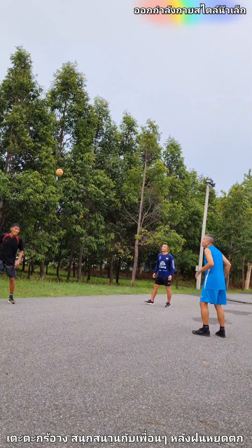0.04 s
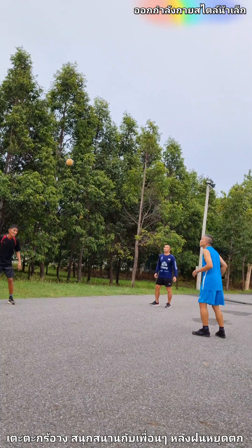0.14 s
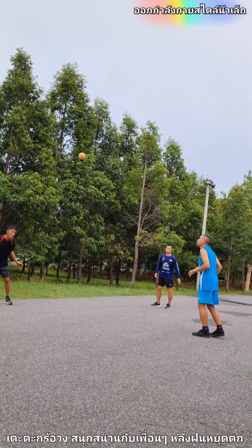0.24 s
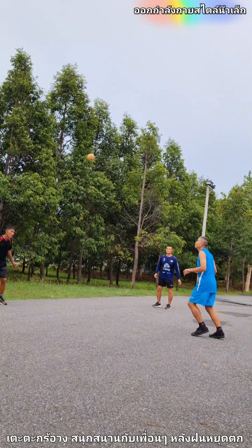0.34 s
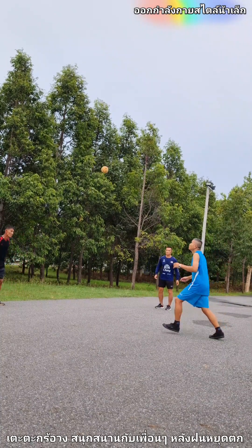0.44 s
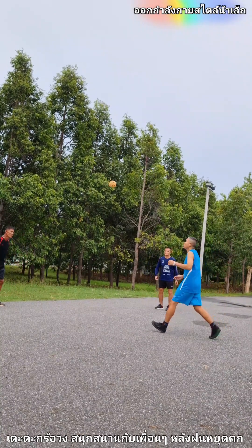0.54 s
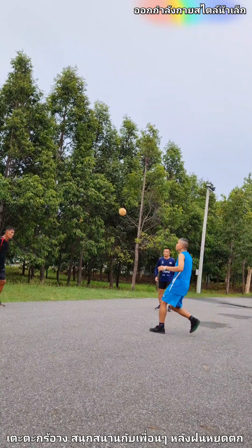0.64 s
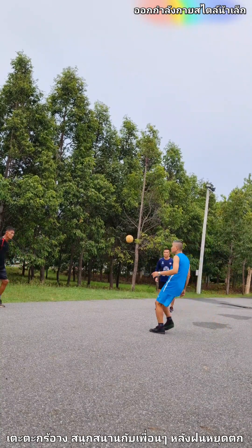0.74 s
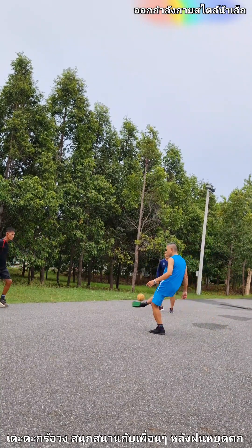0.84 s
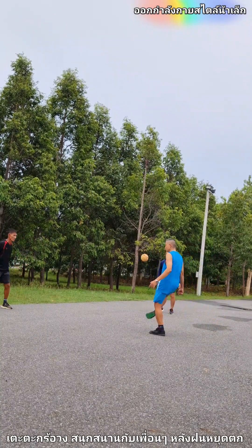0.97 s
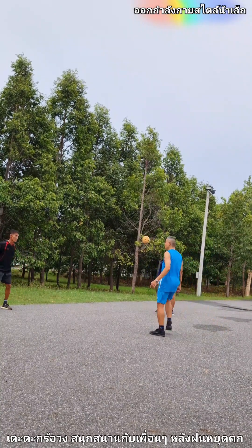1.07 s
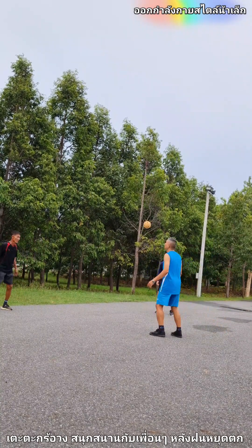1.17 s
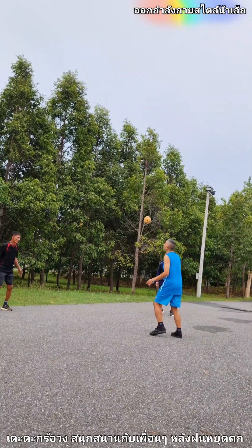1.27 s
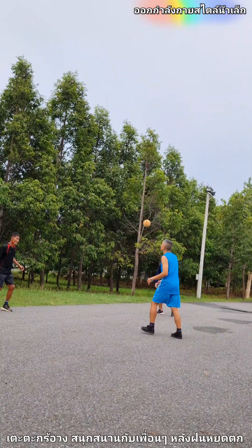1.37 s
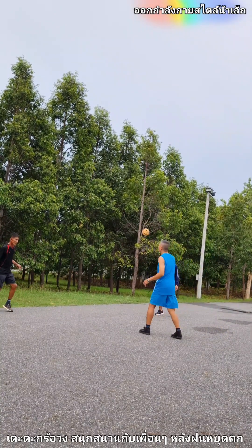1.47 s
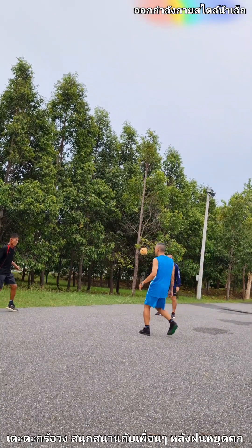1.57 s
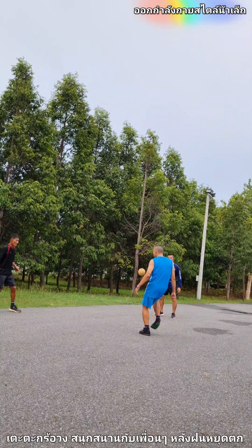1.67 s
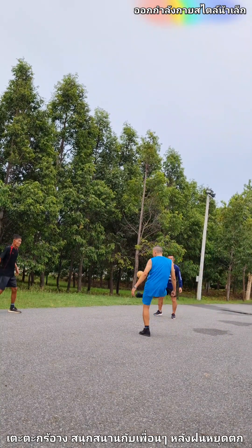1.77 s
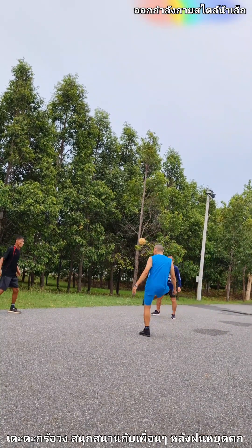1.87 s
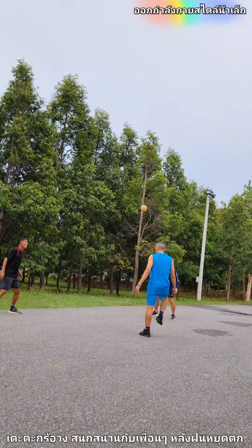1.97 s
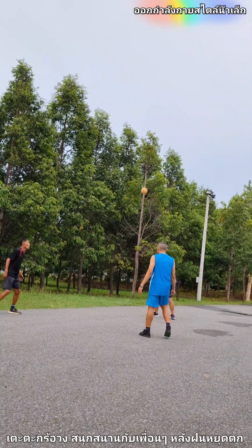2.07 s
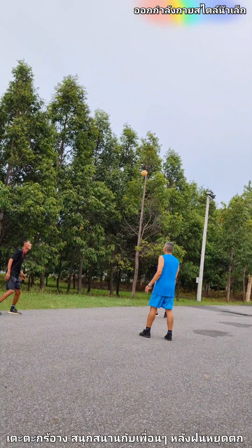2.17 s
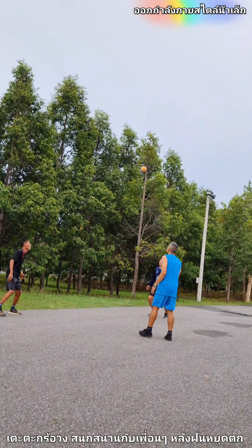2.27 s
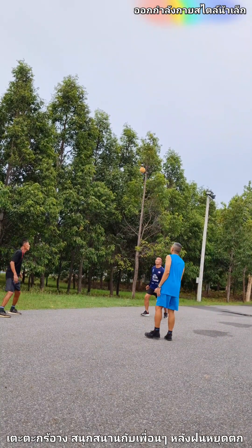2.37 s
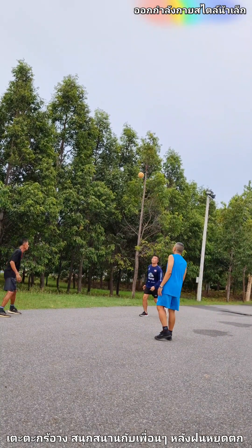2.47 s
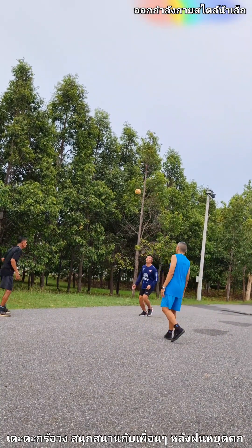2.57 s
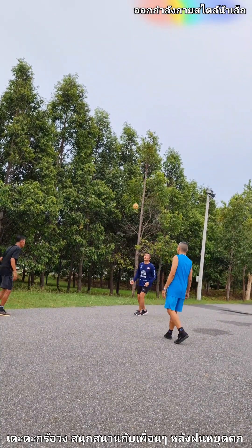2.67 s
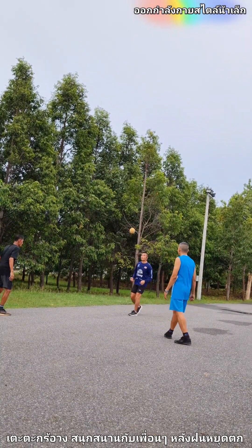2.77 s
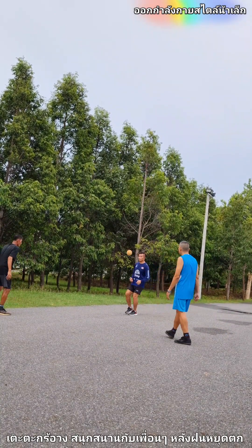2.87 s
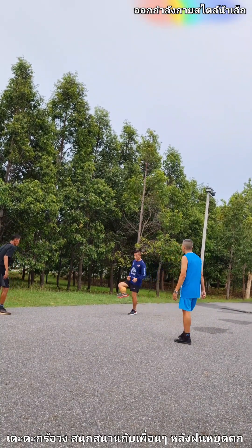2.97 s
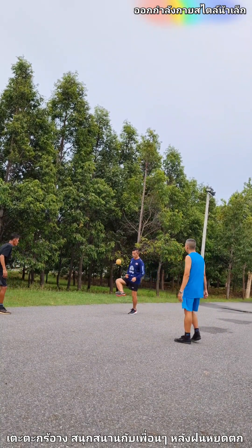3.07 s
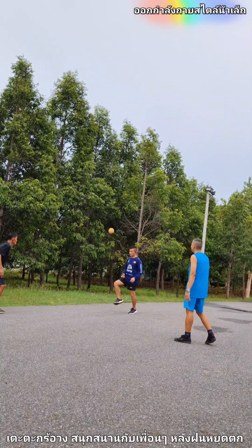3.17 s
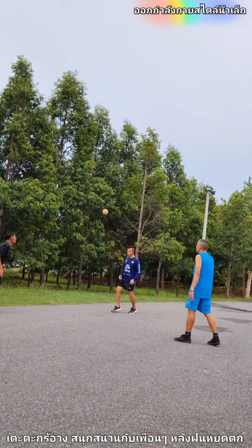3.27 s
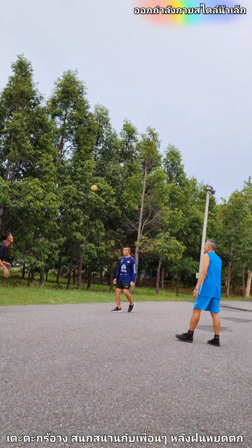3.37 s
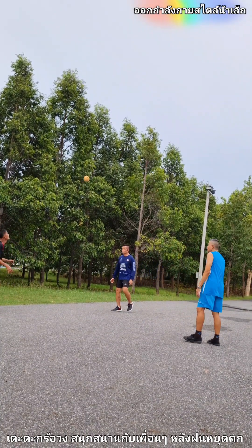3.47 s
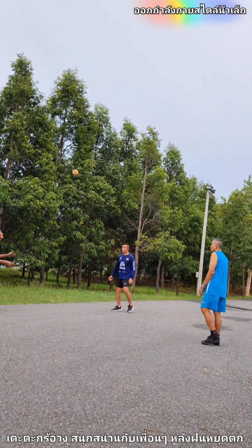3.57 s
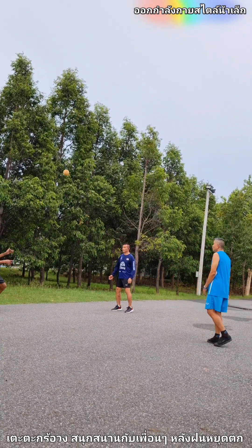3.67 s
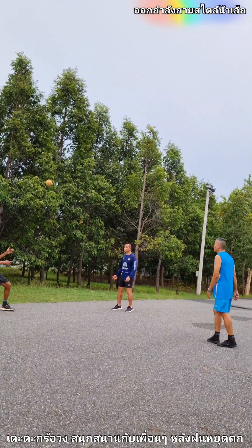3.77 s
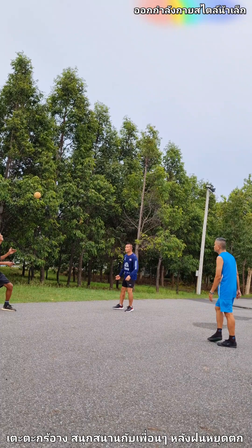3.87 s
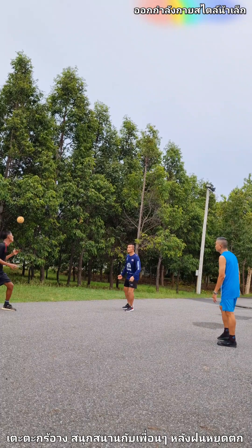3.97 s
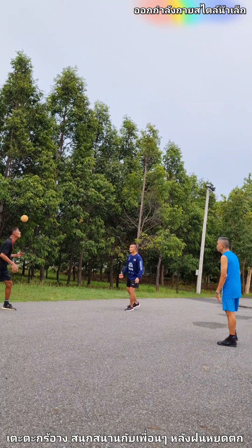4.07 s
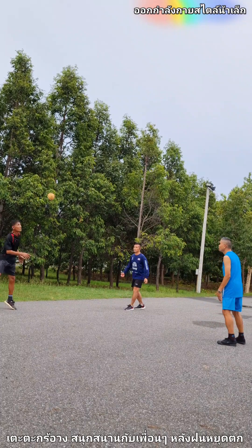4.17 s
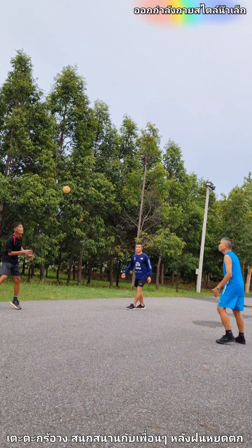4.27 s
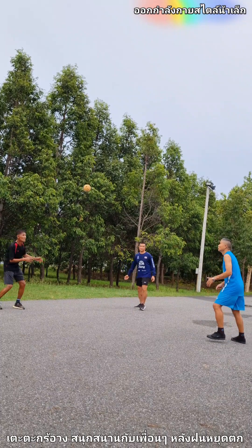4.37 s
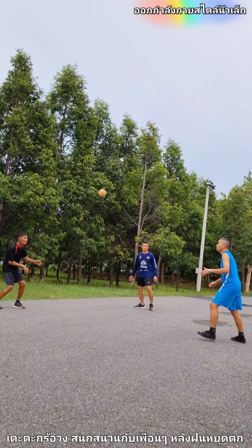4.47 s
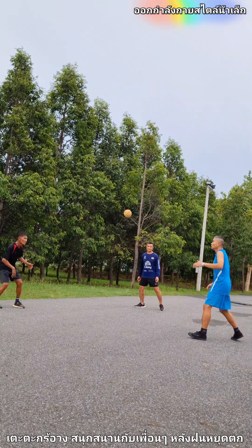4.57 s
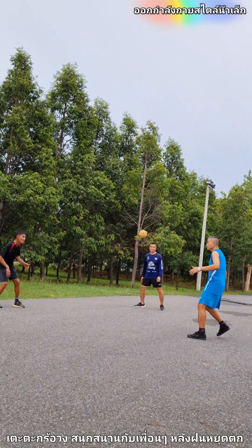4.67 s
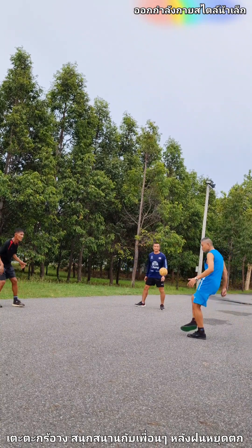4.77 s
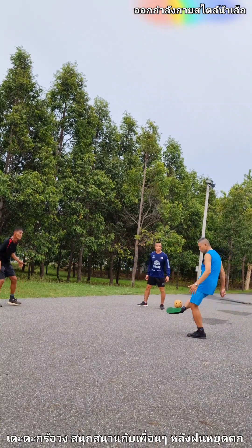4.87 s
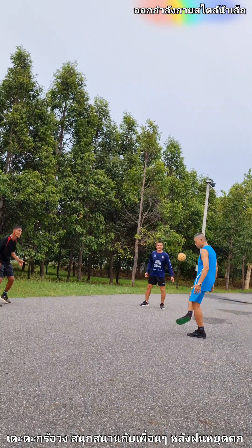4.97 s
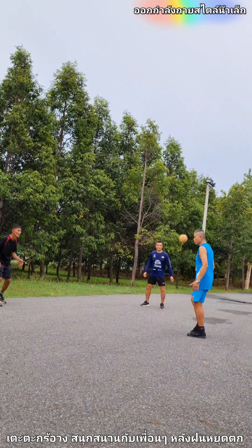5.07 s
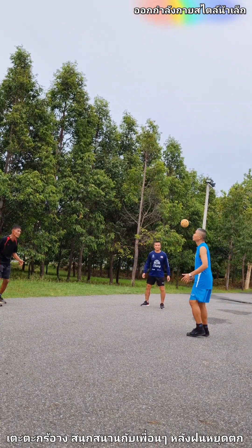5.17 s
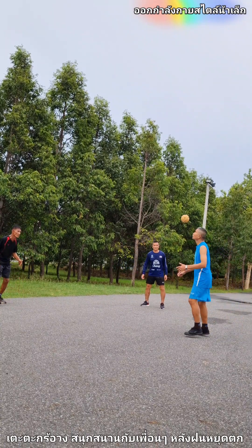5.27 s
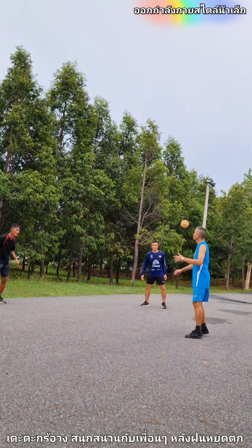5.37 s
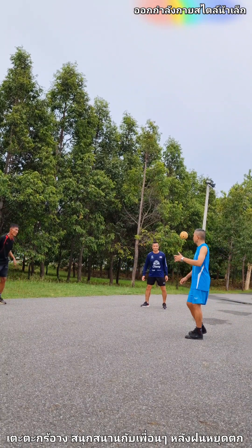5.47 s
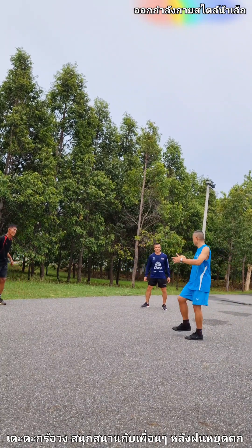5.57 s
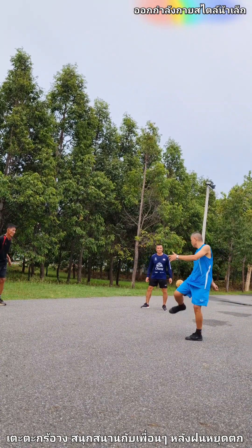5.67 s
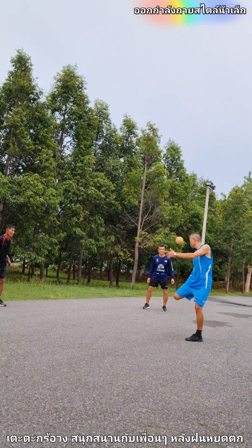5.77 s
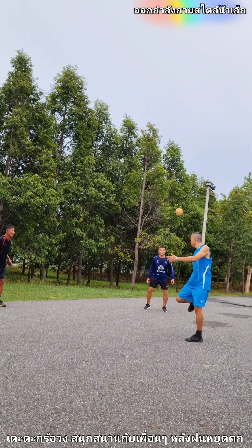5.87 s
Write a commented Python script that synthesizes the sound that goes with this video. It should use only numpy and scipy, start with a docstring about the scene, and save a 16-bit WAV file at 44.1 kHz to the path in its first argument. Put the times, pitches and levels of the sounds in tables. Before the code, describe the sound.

A sharp, hollow kick on a woven plastic ball starts a rally, and five more follow at an even pace, some dull thumps, others bright cracks with a brief rattle. Soles drag and heels slap on gritty asphalt in between. The ball and shoes are close to a stereo microphone in the open air, with a faint, high insect buzz, a soft rumble and far traffic behind them.

```python
"""An asphalt court beside a row of trees, heard through a stereo pair of microphones.
Close by, three players keep a woven takraw ball in the air. Each kick is a thump, a hollow knock
and a crack of plastic strips, with an outdoor echo after it. Shoes tap and scuff on the grit.
Farther off, insects buzz in the foliage over a light breeze, distant traffic and a low rumble."""
import sys
import numpy as np
from scipy import signal
from scipy.fft import rfft, irfft, next_fast_len
from scipy.io import wavfile
from scipy.ndimage import uniform_filter1d

SR = 44100
rng = np.random.default_rng(int(sys.argv[2]) if len(sys.argv) > 2 else 0)


def digitize_waveform(pressure):
    """Quantize a signal to 16-bit integers and store it at the path in sys.argv[1].

    Rows of a 2-D input are taken as channels; values are limited to [-1, 1].
    """
    field = np.atleast_2d(pressure).T
    bounded = np.clip(field, -1, 1)
    quanta = np.round(bounded * 32767).astype(np.int16)
    wavfile.write(sys.argv[1], SR, quanta)


N = 261380
TIME = np.arange(N) / SR

# How alike the left and right channels are: wide in the middle, nearly mono in the bass and above 6 kHz.
# Each row: frequency in Hz, likeness from 0 to 1.
STEREO_LIKENESS = [(100, .99), (300, .97), (700, 0.82), (1400, 0.67), (2200, 0.01), (5900, 0.012),
                   (6500, 0.89), (7600, 0.96), (16000, 0.85)]
# Phase of close sounds at the pair. Each row: frequency in Hz, lead of the left in radians.
MIC_PHASE = [(100, 0.2), (450, -0.08), (1100, -0.4), (2000, -2), (4000, -1.93), (6500, 0.86), (16000, -0.5)]
# Balance of close sounds at the pair. Each row: frequency in Hz, left over right in dB.
MIC_BALANCE = [(100, 1), (1000, -0.5), (2000, 7.5), (3800, -6), (7000, -2), (12000, -5.5)]

# Low outdoor rumble. Each row: frequency in Hz, relative density in dB.
RUMBLE_SPECTRUM = [(15, -15), (30, -6), (45, -6), (62, 5), (78, -3), (97, 2.5), (125, -6), (165, -10.5),
                   (230, -18.5), (400, -37), (2000, -89)]
# Far traffic. Each row: frequency in Hz, relative density in dB.
TRAFFIC_SPECTRUM = [(60, -15), (120, 0), (170, 4), (270, -3), (360, -9.5), (440, -9), (750, -23.5),
                    (1500, -36), (3000, -44.5), (16000, -44.5)]
# The swell of that traffic. Each row: time in seconds, level in dB.
TRAFFIC_LEVEL = [(0.0, -56.5), (0.83, -59.5), (2.52, -60.5), (4.44, -54.5), (4.9, -55.5), (5.4, -59.5),
                 (5.93, -59.5)]
# Breeze in the trees. Each row: frequency in Hz, relative density in dB.
BREEZE_SPECTRUM = [(200, 2), (700, 2.5), (1700, 0), (2800, -4), (5000, -13.5), (16000, -40)]
# Faint hiss. Each row: frequency in Hz, relative density in dB.
HISS_SPECTRUM = [(200, -8), (2500, -2), (3600, 1), (6000, -47), (9500, -2), (12000, 2), (15500, 5.5)]
# Body resonances of the far insects. Each row: frequency in Hz, width in Hz, level in dB.
INSECT_BANDS = [(4736, 960, -70.5), (6440, 550, -72), (7666, 760, -64), (11140, 1400, -85.5)]

# Soles dragging as a player lunges or turns.
# Each row: start in seconds, level in dB, time to the peak in seconds, grit relative to sole in dB.
SOLE_DRAGS = [ (0.05, -59, 0.017, -8), (0.148, -53.5, 0.028, -4.5), (0.377, -57.5, 0.025, -11.5),
              (1.137, -59, 0.022, -5.5), (1.325, -60.5, 0.01, -19), (1.445, -66, 0.015, -22),
              (2.10, -57.5, 0.022, -2), (2.682, -45.5, 0.014, -16), (2.734, -50, 0.014, -3.5),
              (3.285, -57, 0.026, -10), (3.611, -61.5, 0.052, -12.5), (3.844, -58, 0.015, -22),
              (4.325, -55, 0.035, -8), (4.822, -58.5, 0.037, -2), (5.424, -52, 0.035, -4.5),
              (5.858, -53, 0.02, -2.5)]
# Dull scrape of a sole. Each row: frequency in Hz, relative density in dB.
SOLE_SPECTRUM = [(100, 7.5), (300, 2.5), (650, 6), (1000, 2.5), (1700, -1.5), (2400, -14), (5000, -15),
                 (16000, -56)]
# Bright grit under it. Each row: frequency in Hz, relative density in dB.
GRIT_SPECTRUM = [(500, -13), (1700, 5.5), (2500, 4), (3500, 7.5), (4800, 3.5), (7000, -5), (10000, -9),
                 (16000, -16)]
# Heels slapping the asphalt. Each row: start in seconds, level in dB, pitch in Hz.
HEEL_SLAPS = [(0.1140, -39.5, 570), (0.9655, -35.5, 820), (2.7055, -37, 790), (2.7480, -34.5, 750),
              (3.3950, -44, 890), (5.1186, -28, 553), (5.4762, -33, 1240)]

# The kicks, close by. Each row: start in seconds, thump level in dB and pitch in Hz, knock level in dB,
# pitch in Hz and rise in seconds, clack level in dB and pitch in Hz, crack level in dB, squeeze time in
# seconds, spring-back delay in seconds and relative level in dB, rattle level in dB, left-right
# likeness of the crack from 0 to 1.
BALL_KICKS = [ (0.9022, -18.5, 155, -17, 524, 0.0015, -24.5, 3150, -23.5, 0.0025, 0.0076, -10, -14.5, 0.26),
              (1.7736, -22, 130, -39, 610, 0.00085, -44, 2500, -32, 0.0023, 0.0047, 1.5, -30, 0.25),
              (3.0240, -24, 148, -23.5, 960, 0.0014, -26, 4440, -25.5, 0.0025, 0.0063, -2.5, -26, 0.72),
              (4.0697, -61, 130, -21, 1033, 0.0018, -37, 1970, -20.5, 0.0014, 0.014, -27, -36, 1),
              (4.8975, -23, 165, -27.5, 700, 0.0022, -38, 2300, -32, 0.0026, 0.00517, -9, -23.5, 0.1),
              (5.7200, -25, 334, -30, 660, 0.0026, -28.5, 1590, -26.5, 0.0028, 0.0091, -17, -18, 0)]
# Modes of the woven shell. Each row: frequency in Hz, width in Hz, relative level in dB.
SHELL_MODES = [(950, 160, -6.5), (2500, 130, -8), (3310, 250, 2), (4680, 1080, 1.5), (6600, 1230, 2.5),
               (7860, 830, 6.5), (10000, 3700, -3), (14500, 3500, -5)]
# Loose strips shaking after a kick. Each row: frequency in Hz, relative density in dB.
RATTLE_SPECTRUM = [(500, 29.5), (1100, 11.5), (1900, 16), (3200, 11.5), (5000, 16), (7000, 17.5), (8500, 9),
                   (10500, 10), (16000, 7)]
# The shoe and the ball's wall shaking. Each row: frequency in Hz, relative density in dB.
SHUDDER_SPECTRUM = [(50, -38), (120, -22), (250, -2), (450, 5.5), (700, -0.5), (1100, 0), (2000, -51),
                    (16000, -52)]
# Colour of the tail after each kick: an outdoor echo, with an added lift near 7.8 kHz.
# Each row: frequency in Hz, relative density in dB.
TAIL_SPECTRUM = [(100, 4), (400, 6), (1000, 6.5), (1800, -3), (2600, 0), (3600, 5.5), (5000, 6.5),
                 (6600, 5.5), (7800, 7), (9200, 0), (13000, -1), (16000, -1)]


def from_db(db):
    """Decibels to gain."""
    return 10 ** (np.asarray(db) / 20)


def rms_one(x):
    """Scale to an rms of 1."""
    return x / np.sqrt(np.mean(x ** 2) + 1e-20)


def at_hz(points, hz):
    """Read a table on a log-frequency axis."""
    known_hz, value = np.transpose(points)
    return np.interp(np.log(hz + 1e-3), np.log(known_hz), value)


def colour(x, spectrum):
    """Give a steady noise a spectrum, at an rms of 1."""
    size = next_fast_len(x.shape[-1])
    hz = np.arange(size // 2 + 1) * SR / size
    shaped = rfft(x, size) * from_db(at_hz(spectrum, hz))
    return rms_one(irfft(shaped, size)[..., :x.shape[-1]])


def wander(length, size):
    """A random waver of spread 1 that changes over about size samples."""
    return rms_one(uniform_filter1d(rng.standard_normal(length), size=size, mode="wrap"))


def resonate(x, hz, width_hz):
    """A resonance with gain 1 at its top."""
    r = np.exp(-np.pi * width_hz / SR)
    feedback = [1, -2 * r * np.cos(2 * np.pi * hz / SR), r * r]
    return signal.lfilter(np.array([1, 0, -1]) * (1 - r * r) / 2, feedback, x)


def swell(t, rise_s, order=1):
    """A contact force: up to 1 at rise_s, then dying away."""
    u = np.maximum(t, 0) / rise_s
    return (u * np.exp(1 - u)) ** order


def fade(t, t60_s):
    """Free decay, 60 dB down after t60_s."""
    return from_db(-60 * t / t60_s)


def tone_burst(t, hz, rise_s, order=3):
    """A heavily damped mode that builds up while the contact lasts."""
    return swell(t, rise_s, order) * np.sin(2 * np.pi * hz * t)


def add(out, start_s, sound):
    """Mix a sound in at start_s."""
    start = max(round(start_s * SR), 0)
    out[:, start:start + sound.shape[-1]] += sound[..., :N - start]


def pan(db):
    """Gains for the two channels, the left louder by db."""
    return from_db(np.array([[db], [-db]]) / 2)


def stereo_noise(size, grain_db=0, likeness=None):
    """Noise partly alike in left and right; grain_db roughens it into dense, uneven clicks."""
    padded = next_fast_len(size)
    grains = from_db(grain_db * np.minimum(rng.exponential(1, padded), 5))
    mid, side = rfft(rng.standard_normal((2, padded)) * grains)
    if likeness is None:
        likeness = at_hz(STEREO_LIKENESS, np.arange(len(mid)) * SR / padded)
    likeness = np.clip(likeness, -.999, .999)
    both = np.sqrt(1 + likeness) * mid + np.sqrt(1 - likeness) * side * [[1], [-1]]
    return rms_one(irfft(both, padded)[:, :size])


def close_pickup(x):
    """Close sound meets the two microphones with phase and level differences that vary with frequency."""
    size = next_fast_len(x.shape[-1] + SR // 50)
    hz = np.arange(size // 2 + 1) * SR / size
    left = from_db(at_hz(MIC_BALANCE, hz) / 2) * np.exp(.5j * at_hz(MIC_PHASE, hz))
    return irfft(rfft(x, size) * np.array([left, 1 / left]), size)[:, :x.shape[-1]]


def open_air(rumble_db=-50.5, waver_db=1.6, traffic_trim_db=-0.1, breeze_db=-77.0, hiss_db=-72.5):
    """A wavering low rumble, far traffic, a breeze in the trees on the left and a faint hiss."""
    rumble_gain = from_db(rumble_db + waver_db * wander(N, size=8000))
    rumble = rumble_gain * colour(stereo_noise(N), RUMBLE_SPECTRUM)
    traffic_db = np.interp(TIME, *np.transpose(TRAFFIC_LEVEL)) + traffic_trim_db
    traffic = from_db(traffic_db) * colour(stereo_noise(N), TRAFFIC_SPECTRUM)
    breeze = from_db(breeze_db) * colour(stereo_noise(N), BREEZE_SPECTRUM)
    hiss = from_db(hiss_db) * colour(stereo_noise(N), HISS_SPECTRUM)
    return (rumble + traffic) * pan(1.0) + breeze * pan(8.1) + hiss * pan(-3.0)


def insects(waver_db=1.0):
    """Many far insects, a little to the right: their clicks merge into a buzz in a few body resonances."""
    out = 0
    for hz, width_hz, db in INSECT_BANDS:
        clicks = stereo_noise(N, grain_db=1.0)
        buzz = resonate(resonate(clicks, hz, width_hz), hz, width_hz)
        out = out + rms_one(buzz) * from_db(db + waver_db * wander(N, size=1500))
    return out * pan(-2.4)


def shuffles(steps_per_s=3.0, db=-65.5, spread_db=1.2, rise_s=0.0072, grit_db=-10.5):
    """Light steps at a loose walking pace, as rows like those of SOLE_DRAGS."""
    late, weight = rng.standard_normal((40, 2)).T
    starts = (np.arange(len(late)) + .5 + late / 4) / steps_per_s
    return [(s, db + spread_db * w, rise_s, grit_db) for s, w in zip(starts, weight) if s < N / SR]


def scuffs(echo_db=-19, echo_t60_s=0.8, uneven_db=1.67):
    """A sole drags, catching unevenly on loose grit, and leaves a faint echo."""
    out, t = np.zeros((2, N)), TIME[:SR // 4]
    for start_s, db, rise_s, grit_db in list(SOLE_DRAGS) + shuffles():
        force = swell(t, rise_s) * from_db(uneven_db * wander(len(t), size=200))
        echo = from_db(echo_db) * fade(t, echo_t60_s) * (1 - np.exp(-t / rise_s))
        sole = colour(stereo_noise(len(t), grain_db=4.5), SOLE_SPECTRUM)
        grit = colour(stereo_noise(len(t), grain_db=5.5, likeness=0.4), GRIT_SPECTRUM)
        add(out, start_s, from_db(db) * np.hypot(force, echo) * (sole + from_db(grit_db) * grit))
    return out


def heels(rise_s=0.00052, crunch_db=-13, crunch_t60_s=0.074):
    """A rubber heel gives a short pop and crunches the grit under it."""
    out, t = np.zeros((2, N)), TIME[:SR // 8]
    for start_s, db, hz in HEEL_SLAPS:
        pop = tone_burst(t, hz, rise_s, order=1)
        crunch = colour(stereo_noise(len(t), grain_db=3.5), SOLE_SPECTRUM) * fade(t, crunch_t60_s)
        add(out, start_s, from_db(db) * (pop + from_db(crunch_db) * crunch))
    return out


def kick_tail(t, squeeze_s, usual_squeeze_s=0.003, usual_db=-39.5, db_per_doubling=4.5, rise_s=0.0061):
    """A scattered outdoor echo with an added lift near 7.8 kHz, louder after a longer squeeze."""
    db = usual_db + db_per_doubling * np.log2(squeeze_s / usual_squeeze_s)
    clumps_db = 1.76 * wander(len(t), size=400)
    tail = from_db(db + clumps_db) * colour(stereo_noise(len(t), grain_db=2.0), TAIL_SPECTRUM)
    return tail * pan(-1.0) * fade(t, t60_s=0.5) * (1 - np.exp(-t / rise_s))


def ball_shake(t, thump_db, rattle_db, rise_s):
    """The freed ball's loose strips rattle; its deep shudder grows with both thump and rattle."""
    rattle = from_db(rattle_db) * colour(stereo_noise(len(t), grain_db=2.5), RATTLE_SPECTRUM)
    shudder_db = (thump_db + rattle_db) / 2 - 5.5
    shudder = from_db(shudder_db) * colour(stereo_noise(len(t)), SHUDDER_SPECTRUM)
    return (rattle * pan(-1.0) + shudder) * fade(t, t60_s=0.051) * (1 - np.exp(-t / rise_s))


def weave_crack(force, likeness):
    """Plastic strips slap on each other under the force and ring the shell."""
    slaps = stereo_noise(len(force), grain_db=-5.0, likeness=likeness) * force
    rings = sum((-1) ** k * from_db(db) * resonate(slaps, hz, width_hz)
                for k, (hz, width_hz, db) in enumerate(SHELL_MODES))
    return rms_one(rings) * np.sqrt(np.mean(force ** 2))


def kicks(second_knock_db=-2, clack_rise_s=0.0016):
    """Close by, a foot (or, once, a head) squeezes the ball, which springs back milliseconds later, shakes and
    echoes."""
    out, t = np.zeros((2, N)), TIME[:SR // 2]
    for (start_s, thump_db, thump_hz, knock_db, knock_hz, knock_rise_s, clack_db, clack_hz, crack_db,
         squeeze_s, back_s, back_db, rattle_db, likeness) in BALL_KICKS:
        since_back = np.maximum(t - back_s, 0)
        thump = -from_db(thump_db) * np.sin(2 * np.pi * thump_hz * t) * fade(t, t60_s=0.018)
        # The whole ball knocks, and again as it springs back; the struck spot adds a higher clack.
        knock = tone_burst(t, knock_hz, knock_rise_s)
        knock += from_db(back_db + second_knock_db) * tone_burst(since_back, knock_hz, knock_rise_s)
        clack = from_db(clack_db) * tone_burst(t, clack_hz, clack_rise_s, order=2)
        force = swell(t, squeeze_s, order=2) + from_db(back_db) * swell(since_back, squeeze_s, order=2)
        crack = from_db(crack_db) * weave_crack(force, likeness)
        add(out, start_s, close_pickup(thump + from_db(knock_db) * knock + clack + crack))
        add(out, start_s, ball_shake(t, thump_db, rattle_db, rise_s=back_s))
        add(out, start_s, kick_tail(t, squeeze_s))
    return out


def scene():
    """Ball and shoes close to the microphones, insects and open air behind them."""
    return kicks() + insects() + open_air() + close_pickup(heels() + scuffs())


def record(dry):
    """Both channels are cut steeply above 15.9 kHz."""
    return signal.sosfilt(signal.ellip(12, .1, 80, 15900, fs=SR, output="sos"), dry)


dry = scene()
out = record(dry)
digitize_waveform(out)
```